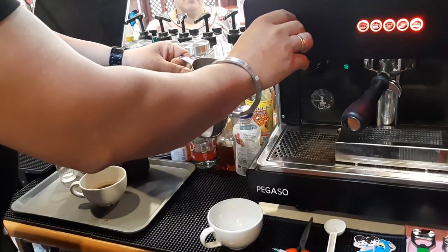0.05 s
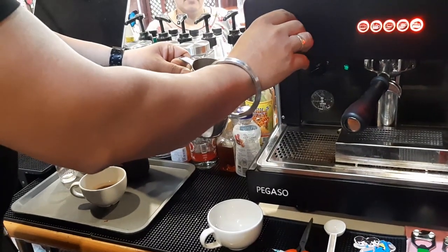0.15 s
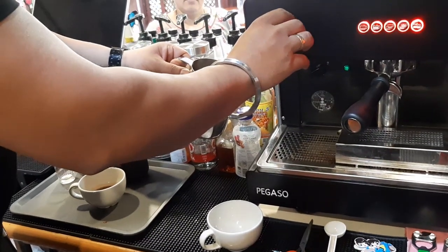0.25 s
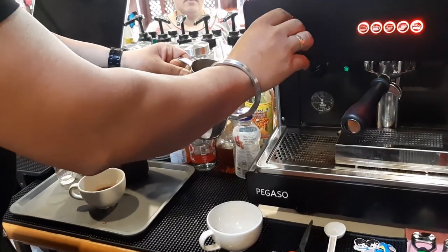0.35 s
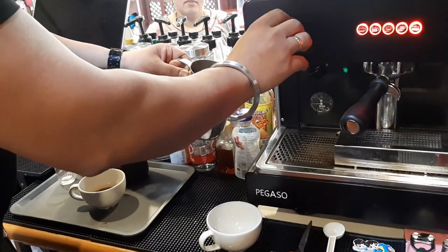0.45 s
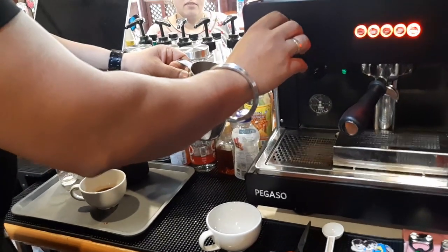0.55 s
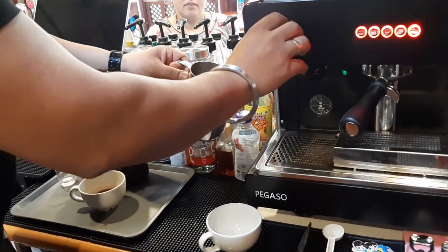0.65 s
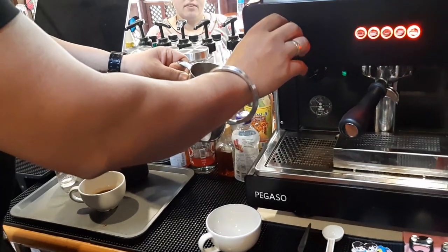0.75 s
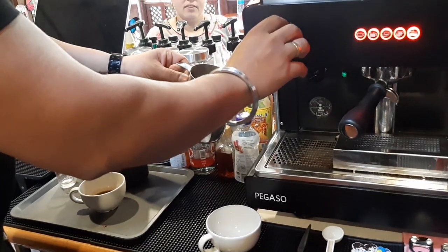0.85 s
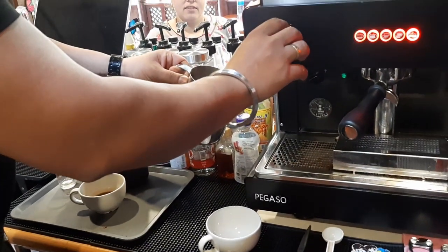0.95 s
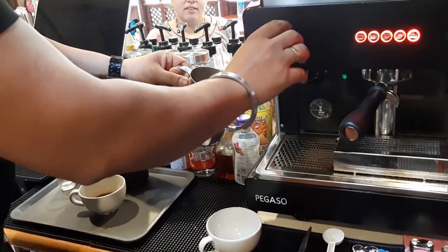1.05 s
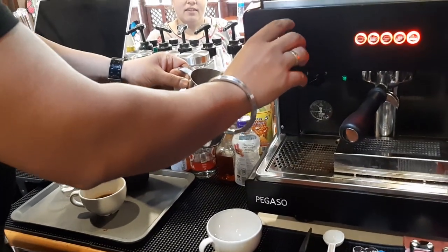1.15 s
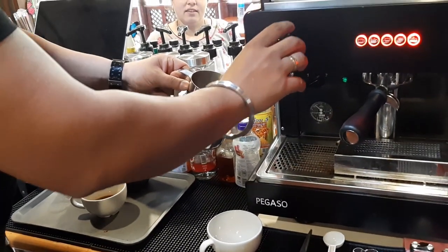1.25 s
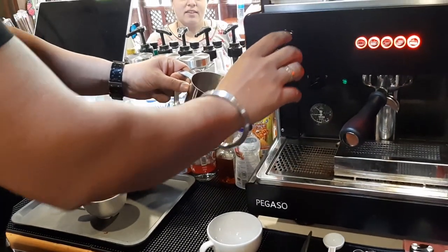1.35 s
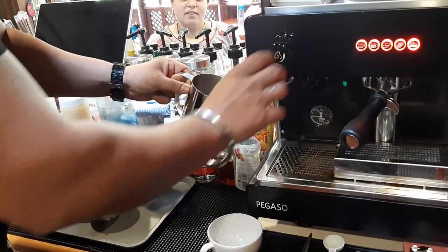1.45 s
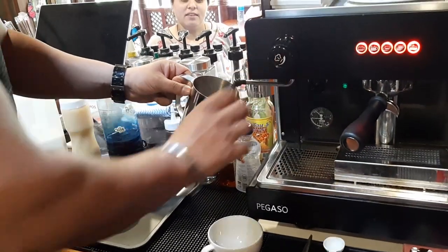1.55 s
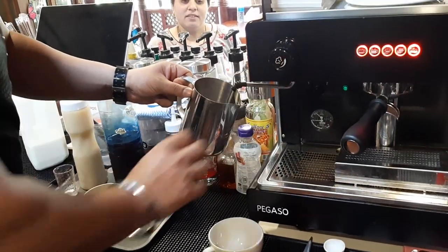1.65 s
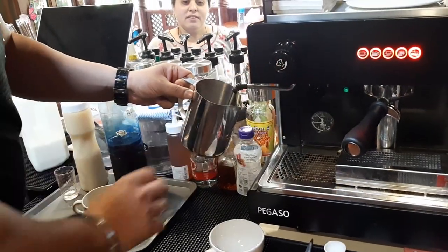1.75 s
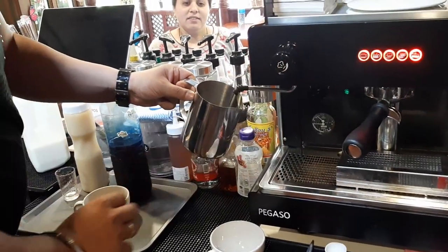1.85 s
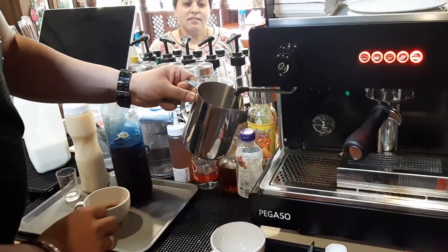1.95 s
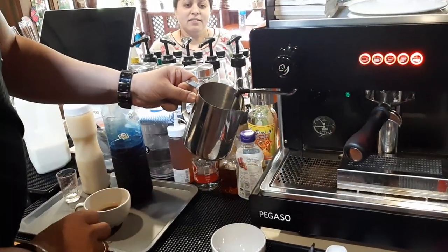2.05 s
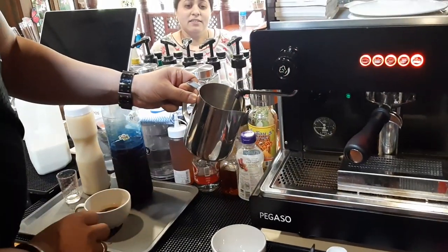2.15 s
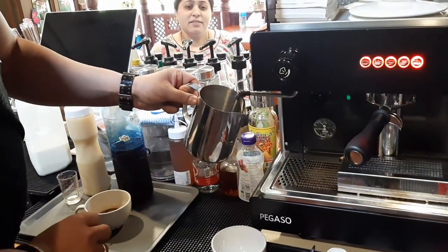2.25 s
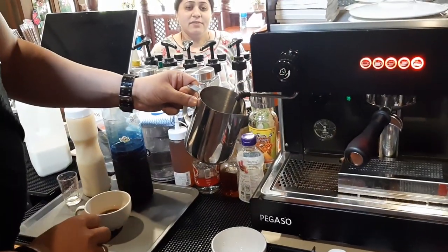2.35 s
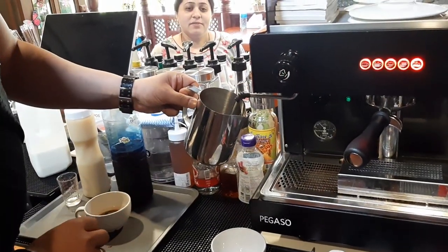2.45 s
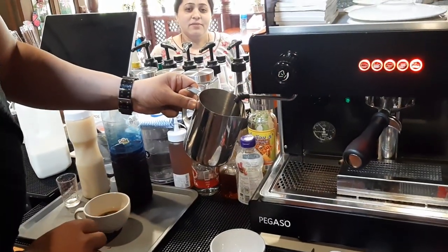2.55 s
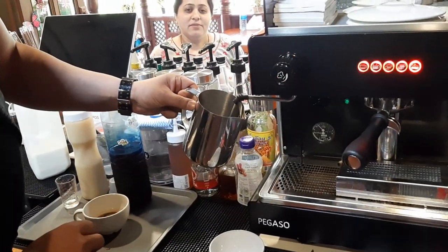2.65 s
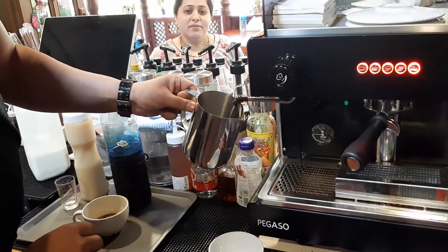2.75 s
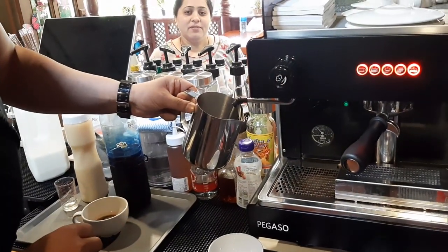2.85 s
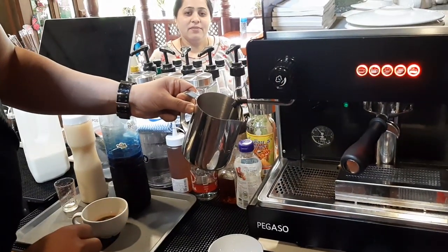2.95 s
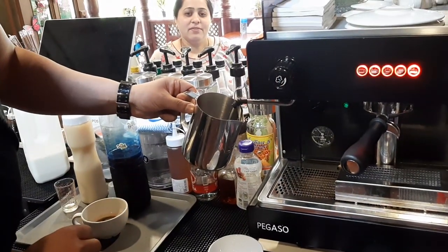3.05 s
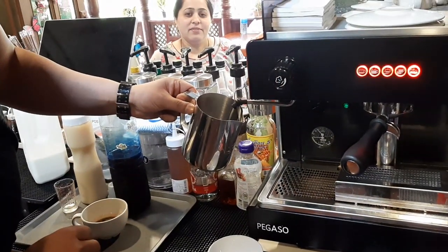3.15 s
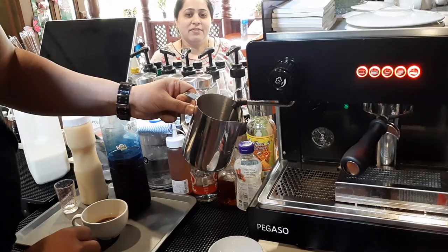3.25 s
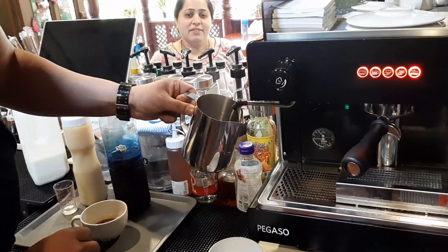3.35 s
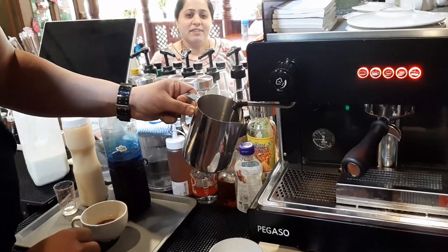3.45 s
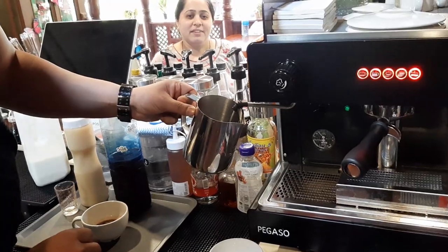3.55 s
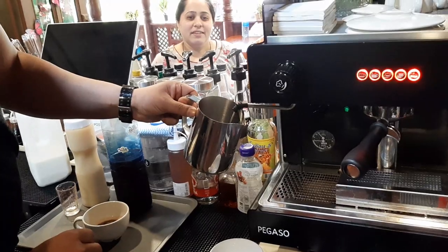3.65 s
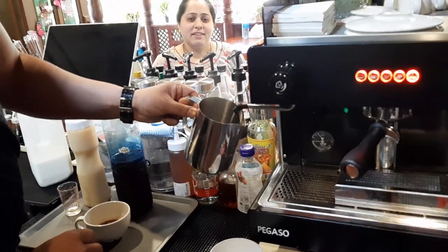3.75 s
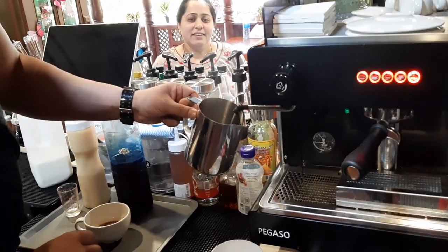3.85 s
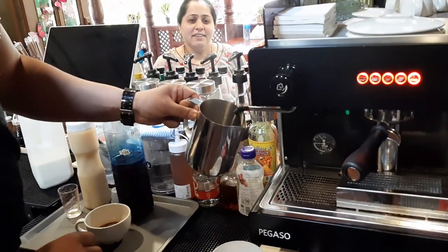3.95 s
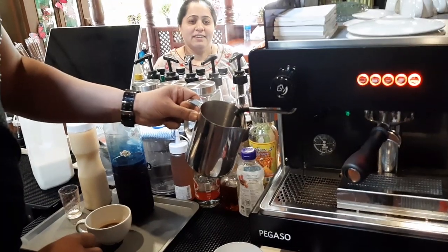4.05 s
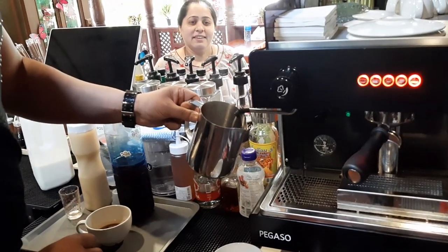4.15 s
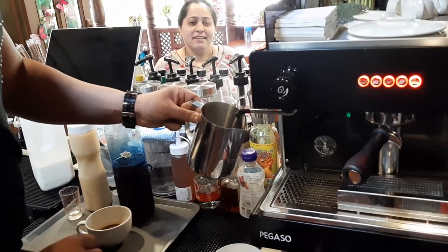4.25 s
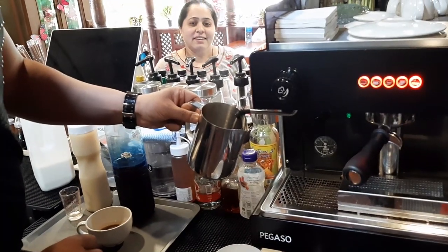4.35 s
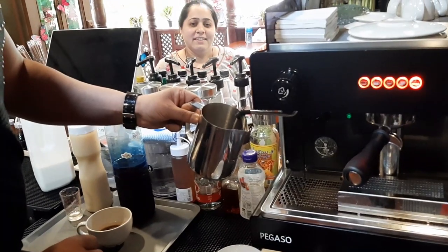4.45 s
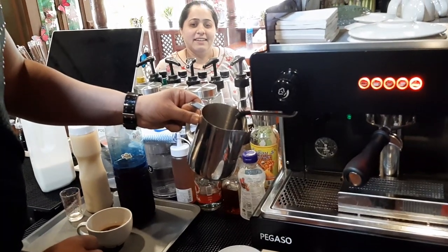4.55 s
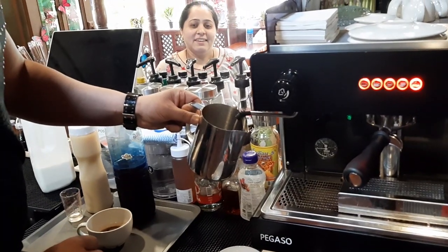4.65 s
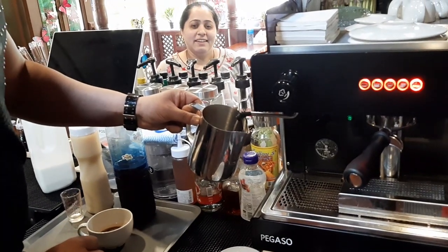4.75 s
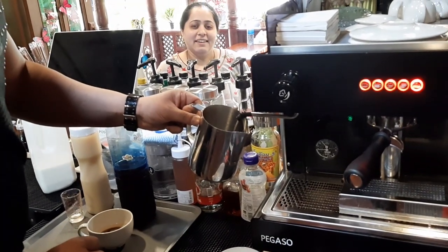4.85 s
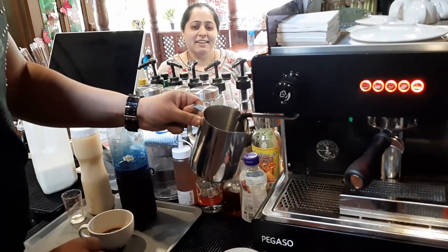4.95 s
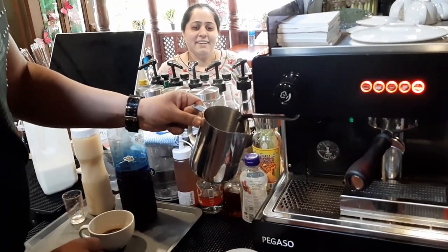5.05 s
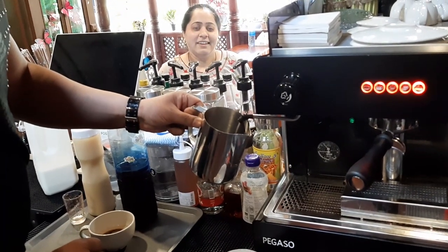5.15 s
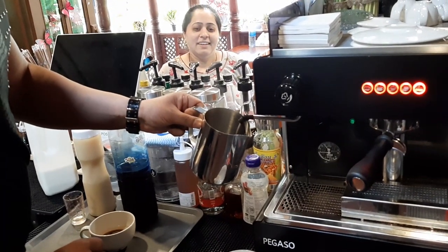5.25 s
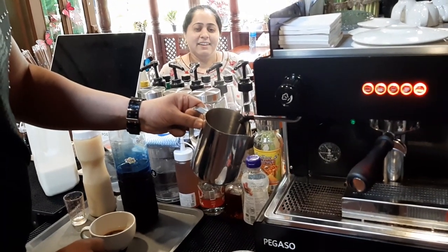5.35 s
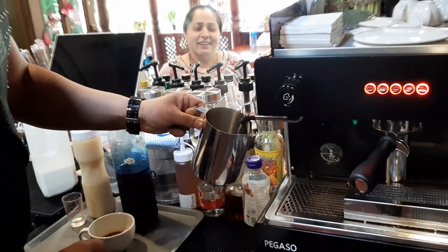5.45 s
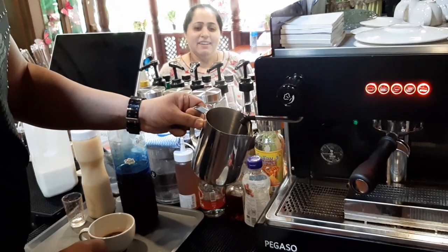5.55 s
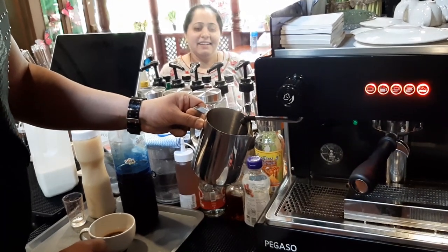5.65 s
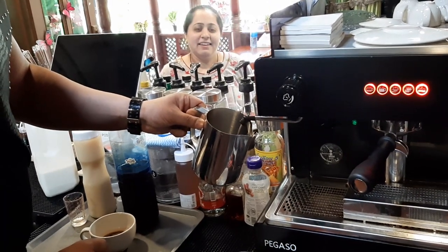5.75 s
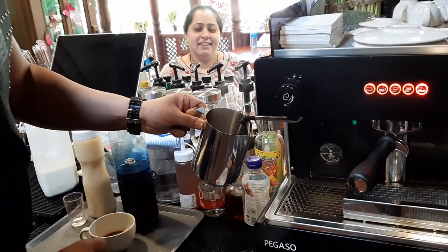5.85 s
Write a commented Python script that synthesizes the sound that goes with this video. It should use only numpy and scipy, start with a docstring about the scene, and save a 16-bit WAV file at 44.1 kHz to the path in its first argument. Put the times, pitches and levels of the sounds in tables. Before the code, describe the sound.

A steam wand in a steel milk pitcher, heard near and fairly dry, with only a short tail from the counter. It starts quietly with ticks and a tiny squeal, bursts into sputtering hiss and ringing metal, then abruptly turns darker: a continuous boiling, resonant roar with low gurgles. The roar slowly loses strength while a little airy hiss creeps back; a weak fridge hum lies underneath.

```python
"""Steam wand frothing milk

A steam wand is opened into a steel pitcher of milk in a small shop. The jet first spits and tears at the thin
cold milk, then roars in the froth: collapsing bubbles (noise of jumping strength) ring modes of air and steel.
The froth's note, a moving band of noise, rises, sinks and climbs again. Sines make whistles and a fridge's hum;
the two microphone ports hear the bass alike and the treble apart."""
import sys
import numpy as np
from scipy import signal
from scipy.fft import rfft, irfft, next_fast_len
from scipy.io import wavfile
from scipy.ndimage import uniform_filter1d, map_coordinates

SR = 44100
rng = np.random.default_rng(int(sys.argv[2]) if len(sys.argv) > 2 else 0)


def output_pcm(signal):
    """Save a mono or channel-first signal as 16-bit PCM at the path in sys.argv[1].

    Samples are clipped to [-1, 1] before scaling.
    """
    pcm = np.clip(np.atleast_2d(signal).T, -1, 1) * 32767
    wavfile.write(sys.argv[1], SR, np.round(pcm).astype(np.int16))


N = 260190

# steam through the tip as the valve is turned: (time [s], flow re nominal opening [dB])
STEAM = [(0, -29), (.08, -31.5), (.2, -22), (.36, -17.5), (.42, -11.5), (.55, -4), (.66, 0), (.76, -2),
         (1.5, 1), (2.05, -0.5), (2.6, 2), (3.6, -1), (4.9, -2), (5.9, -2.5)]
# colour of the dry hiss: (frequency [Hz], relative level [dB])
HISS = [(2500, -31), (4000, 3.5), (5500, 1.5), (7200, 0.5), (9200, -1.5), (10000, -7.5), (10700, -3.5),
        (13100, -3), (15000, -1.5), (15500, 2), (17000, -11.5)]
# the walls lose most of their cold ring: midpoint, time scale
COAT_AT_S, COAT_S = 0.923, 0.03


def amp(db):
    """dB to gain."""
    return 10 ** (np.asarray(db) / 20)


def unit(x):
    """Scaled to rms 1."""
    return x / np.sqrt(np.mean(x ** 2) + 1e-20)


def along(points, hz):
    """(Hz, value) points on a log axis."""
    f, v = np.transpose(points)
    return np.interp(np.log(hz + 1), np.log(f + 1), v)


def curves(rows):
    """One value per sample for each column after the time."""
    s, *cols = np.transpose(rows)
    return [np.interp(np.arange(N) / SR, s, c) for c in cols]


def wobble(rate):
    """A smooth random curve, rate knots a second."""
    knots = rng.standard_normal(int(N * rate / SR) + 4)
    return map_coordinates(knots, [np.arange(N) * rate / SR])


def filtered(x, response):
    """x times a complex response of frequency."""
    m = next_fast_len(N + SR // 2)
    return irfft(rfft(x, m) * response(np.fft.rfftfreq(m, 1 / SR)), m)[..., :N]


def modes(table):
    """The causal response of (Hz, width, dB) resonances, alternating in sign."""
    def response(f):
        total = 0
        for k, (c, w, db) in enumerate(table):
            total = total + (-1) ** k * amp(db) * 1j * f * w / (c * c - f * f + 1j * f * w)
        return total
    return response


def port(column, hz):
    """One column of the port table, read on a log frequency axis."""
    # the two ports compared: (frequency [Hz], likeness [0-1], left lag [rad], left minus right [dB])
    port_rows = [(60, 1, .05, -3), (170, 0.97, .1, -2), (260, 1, 0.27, 0), (348, 0.96, 0.53, -3),
                 (438, 0.5, 0.49, 1.5), (570, 0.99, 0.2, -1), (740, 0.8, .1, 0.5), (874, 0.6, 2.12, 0),
                 (993, 0.9, 1.4, -9), (1180, 0.35, 0.23, -3), (1730, 0.5, 0.98, -2),
                 (2240, 0.6, 1.25, -5.5), (3050, 0.3, 2.1, -1), (5370, 0.1, 7.3, -8),
                 (7000, 0.1, 1.5, -12.5), (10500, 0.1, 6, -6), (15000, 0, 13, -11.5)]
    return along(np.array(port_rows)[:, [0, column]], hz)


def collapses(rate, depth_db, colour):
    """Stereo turbulence whose strength jumps as bubbles collapse, through a colour, rms 1."""
    pair = rng.standard_normal((2, N)) * amp(depth_db * wobble(rate))

    def mid_side(hz):
        turn = np.arccos(np.clip(port(1, hz), 0, 1)) / 2  # sets the likeness of the ports
        return colour(hz) * [np.cos(turn), np.sin(turn)]

    mid, side = filtered(pair, mid_side)
    return unit(np.array([mid + side, mid - side]))


def rising(rate, depth_db, colour, power):
    """Collapses whose colour leans from its low modes to its high ones while the milk rises."""
    turn = np.pi / 2 * np.arange(N) / N
    low = collapses(rate, depth_db, lambda f: colour(f) * (f + 1) ** (-power / 2))
    high = collapses(rate, depth_db, lambda f: colour(f) * (f + 1) ** (power / 2))
    return np.cos(turn) * low + np.sin(turn) * high


def patchy(x, depth_db):
    """x under a random gain field, smooth over some 400 Hz and 70 ms."""
    z = signal.stft(x, nperseg=512)[2]
    field = uniform_filter1d(rng.standard_normal(z.shape[1:]), size=5, axis=0)
    field = uniform_filter1d(field, size=12, axis=1)
    return unit(signal.istft(z * amp(depth_db * unit(field)), nperseg=512)[1][:, :N])


def fridge():
    """Slightly unsteady shaft orders of the motor over a low rumble."""
    # level of the motor: (time [s], level [dB])
    hum = [(0, -38), (1.25, -40), (1.53, -42.5), (1.74, -53), (2.6, -51.5), (3.38, -53.5), (3.75, -44),
           (5.36, -42), (5.9, -49)]
    # shaft orders: (multiple of the shaft speed, relative level [dB])
    orders = [(1, -57), (2, -22.5), (2.5, -10), (3, -1.5), (4, -7.5), (5, -5.5)]
    # colour of the rumble: (frequency [Hz], relative level [dB])
    rumble = [(12, -48), (24, -17), (33, -13.5), (45, -10.5), (62, 0), (87, -6), (120, -4.5), (200, -30),
              (400, -95)]
    shaft_hz, rumble_db = 25.07, -55.5

    turns = np.cumsum(shaft_hz + 0.14 * wobble(6)) / SR
    motor = 0
    for k, db in orders:
        motor = motor + amp(db + 1.6 * wobble(5.7)) * np.sin(2 * np.pi * (k * turns + rng.random()))
    return amp(curves(hum)[0]) * motor + amp(rumble_db) * collapses(16.0, 2.5, lambda f: amp(along(rumble, f)))


def froth():
    """The bubble cloud breathes as a whole; its note moves and sounds through the nook's modes."""
    # bubble cloud: (time [s], level at 0 dB flow [dB], pitch [Hz], spread of bubble sizes [octaves])
    cloud_rows = [(0, -31, 306, 0.4), (.4, -23, 368, 0.9), (.75, -27, 343, 0.58), (1.4, -25.5, 317, 0.21),
                  (1.8, -24, 324, 0.33), (3.76, -28, 270, 0.32), (4.3, -30.5, 244, 0.5),
                  (4.75, -33.5, 279, 0.49), (5.9, -34.5, 315, 0.53)]
    # air modes of the counter nook: (frequency [Hz], width [Hz], relative level [dB])
    nook = [(205.4, 14, 0.5), (243.8, 16.1, 3.5), (290, 14.9, 1.5), (348, 25.6, 0), (396.4, 25.5, 3.5),
            (467, 17.8, 5)]
    # the largest bubbles: (frequency [Hz], width [Hz], relative level [dB])
    largest = [(132.5, 28.4, -0.5), (180, 26, -0.5)]
    # deep gurgle: (time [s], level [dB])
    gurgling = [(0, -57.5), (.42, -38), (.72, -53), (1.3, -48.5), (3.6, -44), (4.25, -35.5), (4.7, -42),
                (5.9, -42.5)]
    cloud_grows = 0.73  # dB per dB of flow

    level_db, pitch_hz, spread = curves(cloud_rows)
    hz, t, z = signal.stft(collapses(30, 0.41, modes(nook)), SR, nperseg=2048)
    frame = np.minimum((t * SR).astype(int), N - 1)
    detune = np.log2((hz[:, None] + 1) / pitch_hz[frame]) / np.clip(spread[frame], .1, 2)
    cloud = 0.028 + 1 / (1 + detune ** 4)  # stray sizes keep a weak skirt
    # level each frame, so that pitch and spread leave the loudness alone
    cloud = cloud / np.linalg.norm(cloud * abs(modes(nook)(hz + 1))[:, None], axis=0)
    note = unit(signal.istft(z * cloud, SR, nperseg=2048)[1][:, :N])
    gurgle = collapses(8.9, 0.24, lambda f: modes(largest)(f) ** 2)
    level_db = level_db + cloud_grows * curves(STEAM)[0]
    return amp(level_db) * note + amp(curves(gurgling)[0]) * gurgle


def pitcher():
    """Collapses boom in the air column and rattle the walls, which lose their ring as froth coats them."""
    # air over the milk: (frequency [Hz], width [Hz], relative level [dB])
    column_modes = [(577.2, 18.4, -1), (607.2, 15.3, 1), (637.8, 17, 2), (670.8, 14.1, 2), (698.3, 13, -2)]
    # wall modes before frothing: (frequency [Hz], width [Hz], relative level [dB])
    cold_modes = [(877, 32, 4.5), (1053, 57, -3), (1180, 75, -1.5), (1257, 89, -1.5), (1538, 60, -2),
                  (1807, 140, -9.5), (2014, 53, -1.5), (2250, 35, -8)]
    # wall modes damped by froth: (frequency [Hz], width [Hz], relative level [dB])
    warm_modes = [(826, 29, 1.5), (869, 24, 0.5), (913, 28.4, 0), (1000, 29, -7), (1061, 51, -3.5),
                  (1123, 18, -6), (1160, 9.5, -5.5), (1256, 56, -10), (1316, 50, -6.5), (1436, 60, -10),
                  (1540, 49, -8), (1620, 42, -5.5), (1754, 34, -6.5), (1920, 57, -7), (2062, 20, -6.5),
                  (2169, 33, -9), (2400, 210, -16.5), (2990, 220, -29)]
    # the air column: (time [s], level [dB])
    boom_rows = [(0.0, -28), (0.05, -50.5), (0.85, -27.5), (0.9, -33.5), (0.97, -26), (1.0, -23.5),
                 (1.12, -22), (1.17, -26.5), (1.22, -22), (1.46, -24.5), (1.49, -21), (1.61, -24.5),
                 (1.64, -23.5), (1.89, -26.5), (2.17, -21.5), (2.66, -24), (2.71, -34), (2.79, -22),
                 (2.82, -26), (3.19, -27.5), (3.22, -22.5), (3.32, -28), (3.63, -25), (3.91, -27.5),
                 (4.44, -26.5), (4.55, -33), (4.7, -27), (4.76, -35), (4.86, -19), (4.93, -27),
                 (5.21, -35.5), (5.24, -25.5), (5.65, -30), (5.7, -27.5), (5.85, -33.5), (5.9, -28)]
    # collapses rattling the walls, in surges: (time [s], level [dB])
    rattle = [(0.0, -40), (0.045, -43.5), (0.06, -47), (0.11, -47.5), (0.13, -44.5), (0.18, -48),
              (0.2, -40.5), (0.26, -40.5), (0.3, -35.5), (0.31, -37.5), (0.43, -30), (0.66, -25.5),
              (0.87, -27), (0.89, -28.5), (1.03, -28), (1.76, -30), (1.77, -29), (2.0, -30), (2.1, -29.5),
              (2.2, -30.5), (2.81, -34.5), (3.06, -31.5), (3.16, -35.5), (4.2, -36.5), (4.32, -34),
              (4.7, -40), (4.8, -35), (4.86, -34), (5.04, -37), (5.37, -36), (5.5, -40), (5.6, -35.5),
              (5.77, -40.5), (5.9, -38)]
    # a near-steady band just above the column: (frequency [Hz], width [Hz], level [dB])
    upper_band = (762, 36, -39.5)
    # random surges of the boom: depth at the start (sign is arbitrary), easing towards zero
    surge_db, surge_db_per_s = -1.26, 0.08
    # the column's lower edge: level it heads for, rise time constant, slow fade
    edge_to_db, edge_rises_s, edge_fades_db_per_s = -25, 0.85, 1.97
    # the rising milk shortens the air column: slope gained by the end, as a power of frequency
    brighten_boom, brighten_walls = 5.5, 0.5
    spit_on_steel_db = -7  # how hard a slug strikes the walls, under its own level
    churn_db = 1.3  # the swirling milk damps the walls in moving patches

    t = np.arange(N) / SR
    cold = np.clip(.95 - 0.43 * (1 + np.tanh((t - COAT_AT_S) / COAT_S)), 0, 1)

    def boom_colour(f):
        return modes(column_modes)(f) / (1 + (f / 730) ** 16) / (1 + (520 / (f + 1)) ** 12)

    def warm_colour(f):
        return modes(warm_modes)(f) / (1 + (500 / (f + 1)) ** 4) / (1 + (f / 4000) ** 4)

    boom = rising(40, 0.24, boom_colour, brighten_boom)
    boom_db = curves(boom_rows)[0] + (surge_db + surge_db_per_s * t) * wobble(16)

    edge = collapses(30, 1.0, lambda f: modes([(515, 90, 0)])(f) ** 2)
    edge_db = edge_to_db - 28 * np.exp(-t / edge_rises_s) - edge_fades_db_per_s * t + 2.1 * wobble(3.7)

    walls = np.sqrt(cold) * collapses(50, 0.94, modes(cold_modes))
    walls = walls + np.sqrt(1 - cold) * rising(55, 1.33, warm_colour, brighten_walls)
    strike = amp(curves(rattle)[0]) + amp(spit_on_steel_db) * spitting()

    band_hz, width_hz, band_db = upper_band
    upper = collapses(18, 1.0, lambda f: modes([(band_hz, width_hz, 0)])(f) ** 2)
    upper = amp(band_db) * np.sqrt(1 - cold) * upper
    return amp(boom_db) * boom + upper + amp(edge_db) * edge + strike * patchy(walls, churn_db)


def pocket():
    """The steam pocket at the tip murmurs: a narrow, fluttering band that follows its note."""
    # its note sinks as the milk closes over it: (time [s], pitch [Hz], level [dB])
    pocket_rows = [(0, 1214, -45), (.07, 1210, -58), (.14, 1150, -39), (.175, 1209, -45.5),
                   (.205, 1197, -38), (.25, 1198, -53), (.29, 1204, -34), (.33, 1228, -57),
                   (.45, 1254, -37), (.7, 1220, -37.5), (.8, 1180, -33.5), (.875, 1060, -29.5),
                   (.9, 1040, -57), (5.9, 1038, -88.5)]
    width_hz = 130

    pitch_hz, level_db = curves(pocket_rows)
    phase = 2 * np.pi * np.cumsum(pitch_hz) / SR
    band = wobble(width_hz) * np.cos(phase) + wobble(width_hz) * np.sin(phase)
    return amp(level_db) * unit(band)


def jet():
    """The jet tears in the milk and leaks a dry hiss; both flutter together, and slugs of water spit."""
    # colour of the tearing: (frequency [Hz], relative level [dB])
    tear_colour = [(1500, -10.5), (2400, -1.5), (3000, 3), (3800, -2), (4500, -10), (5500, -9.5),
                   (6100, -19.5), (6900, -17.5), (7800, -19.5), (10000, -61), (16000, -120)]
    # the jet tearing at the milk: (time [s], level [dB])
    tearing = [(0, -49), (.08, -61.5), (.15, -51.5), (.25, -54.5), (.36, -46.5), (.43, -41.5), (.56, -35),
               (.64, -36), (.74, -30), (.8, -32), (.87, -35), (1.0, -38.5), (1.1, -43), (1.3, -49),
               (1.5, -51), (2.25, -46.5), (2.5, -50), (3.96, -51.5), (5.39, -51), (5.65, -49.5), (5.9, -48)]
    # the dry hiss that creeps back: (time [s], level [dB])
    leak = [(1.3, -85), (1.62, -75.5), (1.85, -65), (2.05, -57), (2.4, -60.5), (3.6, -58.5), (4.66, -55.5),
            (5.04, -52.5), (5.3, -54), (5.45, -51), (5.9, -49.5)]
    # upper wall modes the tearing rings before frothing: (frequency [Hz], width [Hz], relative level [dB])
    cold_high = [(2510, 77, -6), (2794, 40, -6.5), (3064, 53, 0), (3740, 55, 1.5), (4090, 94, -3)]
    hiss_db, hiss_grows = -35, 1.26  # dry hiss at 0 dB flow, dB per dB of flow
    under_s, hiss_sinks_db_per_s = 0.77, 107  # the tip sinks under the milk and the hiss falls
    ring_db, ring_from_s = -5, .4  # wall ring relative to the tearing, start

    t = np.arange(N) / SR
    open_db = hiss_db + hiss_grows * curves(STEAM)[0] - hiss_sinks_db_per_s * np.clip(t - under_s, 0, None)
    leak_db = curves(leak)[0] + 0.65 * wobble(6.6) + 0.6 * wobble(30)
    dry_gain = np.hypot(amp(open_db), amp(leak_db))
    hiss = collapses(140, 1.0, lambda f: amp(along(HISS, f)))

    ring_gate = np.clip(np.minimum(t - ring_from_s, COAT_AT_S - t) / 0.11, 0, 1)
    tear = collapses(150, 1.32, lambda f: amp(along(tear_colour, f)))
    tear = tear + amp(ring_db) * ring_gate * collapses(40, 1.0, modes(cold_high))

    steady = amp(0.43 * wobble(12)) * (amp(curves(tearing)[0]) * tear + dry_gain * hiss)
    return steady + spitting() * (amp(-9) * tear + amp(-5.5) * hiss)


def squeak():
    """The valve whistles as it cracks open: thin, unsteady sines that fade as it opens further."""
    # whistles: (pitch [Hz], relative level [dB], time to fall 60 dB [s])
    whistles = [(5500, -74, .3), (7200, -62, 0.65), (11230, -53, 0.29)]
    # span of the whistles: (start [s], end [s])
    span = (0.147, 0.245)
    waver_rad = 0.9

    t = np.arange(N) / SR
    start, end = span
    gate = np.clip((t - start) / 0.005, 0, 1) * np.clip((end - t) / 0.02, 0, 1)
    out = 0
    for hz, db, t60 in whistles:
        tone = np.sin(2 * np.pi * hz * t + waver_rad * wobble(150))
        out = out + amp(db - 60 * np.abs(t - start) / t60) * tone
    return gate * out


def ticks():
    """Drops and taps near the pitcher: a dying burst of noise, broad around its pitch."""
    # taps: (time [s], relative level [dB], pitch [Hz])
    taps = [(0.245, -50, 4580), (0.2938, -48.5, 5130), (1.312, -60, 5200), (1.38, -52, 5120),
            (1.9072, -44, 4970), (3.6797, -52, 5400)]
    spread_hz, t60_s = 1000, 0.063

    out, t = np.zeros(N + SR), np.arange(SR // 10) / SR
    for s, db, hz in taps:
        a, b = uniform_filter1d(rng.standard_normal((2, len(t))), size=SR // spread_hz // 2, axis=1)
        burst = unit(a * np.cos(2 * np.pi * hz * t) + b * np.sin(2 * np.pi * hz * t))
        out[round(s * SR):][:len(t)] += amp(db - 3 - 60 * t / t60_s) * burst
    return out[:N]


def spitting():
    """The envelope of the slugs of water: a quick rise, then a short decay."""
    # slugs of water leave the tip: (time [s], relative level [dB], time to fall 60 dB [s])
    slugs = [(0.384, -21.5, 0.099), (0.4505, -30, 0.063), (0.5294, -27, 0.03), (0.644, -29.5, 0.092),
             (0.699, -24, 0.046), (0.732, -26.5, 0.069)]
    rise_s = 0.003

    t = np.arange(N) / SR
    out = 0
    for s, db, t60 in slugs:
        decay = amp(db - 60 * np.abs(t - s) / max(t60, .01))
        out = out + decay * np.clip((t - s) / rise_s, 0, 1) ** 2
    return out


def singing():
    """Moments when one mode sings out: short wavering notes with a quick rise, hold and quick fall."""
    # notes: (start [s], length [s], pitch [Hz], level [dB])
    notes = [(0.878, 0.021, 605.5, -19), (0.894, .04, 606, -17), (0.986, .022, 594, -17),
             (1.023, 0.13, 631, -23.5), (1.254, .17, 299.6, -26), (1.617, 0.17, 607, -24.5),
             (1.78, 0.11, 353.7, -26), (4.848, 0.041, 640, -26), (5.262, 0.03, 650, -29),
             (5.36, .07, 640, -25)]
    rise_s = 0.009

    t = np.arange(N) / SR
    waver_rad, swell_db = 0.4 * wobble(25), 1.9 * wobble(33)
    out = 0
    for s, length, hz, db in notes:
        gate = np.clip(np.minimum(t - s, s + length - t) / rise_s, 0, 1)
        out = out + gate * amp(db + swell_db) * np.sin(2 * np.pi * hz * t + waver_rad)
    return out


def shop(x, wet_db):
    """The machine front, counter and walls answer with a short dense tail, different at each port."""
    t60_s = 0.047
    t = np.arange(SR // 4) / SR
    tail = rng.standard_normal((2, len(t))) * amp(-60 * t / t60_s) * (t > .002)
    wet = signal.fftconvolve(x, tail / np.linalg.norm(tail[0]), axes=1)[:, :N]
    return x + amp(wet_db) * filtered(wet, lambda f: f / (f + 1500))


def scene():
    """All sources; the jet, taps and whistles fill the shop, over a faint steady hiss."""
    # the nook's echoes cancel narrow bands: (frequency [Hz], width [Hz], depth [0-1])
    nulls = [(481, 19.4, 0.76), (720, 9, .8), (822, 11, 0.3)]

    def echo_nulls(f):
        gain = 1
        for hz, width_hz, depth in nulls:
            gain = gain * (1 - np.clip(depth, 0, 1) * np.exp(-((f - hz) / width_hz) ** 2))
        return gain

    floor = amp(-66.0) * collapses(3, .7, lambda f: amp(along(HISS, f)) / (1 + (10500 / (f + 1)) ** 6))
    milk = filtered(froth() + pitcher(), echo_nulls) + pocket() + singing()
    steam = shop(jet() + amp(2.5) * (ticks() + squeak()), wet_db=-6)
    return milk + steam + fridge() + floor


def record(dry):
    """Port shading, lag and cavity dip, softly rounded peaks, then the band limit."""
    # the port cavity cancels a band: (frequency [Hz], width [Hz], depth [0-1])
    port_dip = (8600, 970, 0.85)
    top_hz, ceiling = 15760, .46

    half = np.array([[.5], [-.5]])  # left, right
    dip_hz, width_hz, depth = port_dip

    def ports(hz):
        dip = 1 - np.clip(depth, 0, 1) * np.exp(-((hz - dip_hz) / width_hz) ** 2)
        return dip * amp(half * port(column=3, hz=hz)) * np.exp(-1j * half * port(column=2, hz=hz))

    x = filtered(dry, ports)
    x = x / (1 + np.abs(x / ceiling) ** 6) ** (1 / 6)
    return filtered(x, lambda hz: hz < top_hz)


dry = scene()
out = record(dry)
output_pcm(out)
```